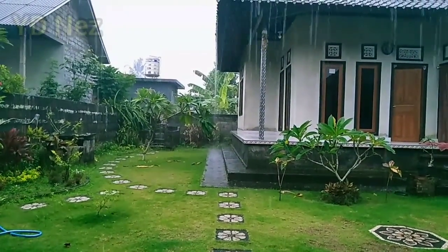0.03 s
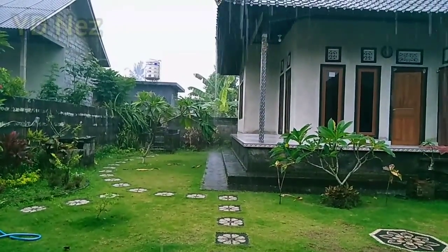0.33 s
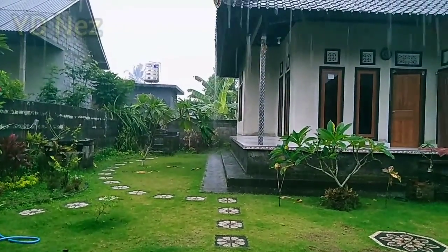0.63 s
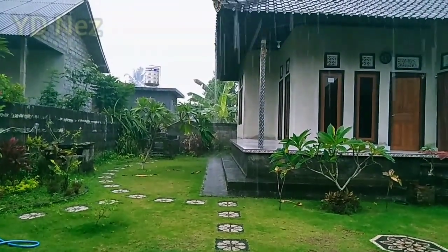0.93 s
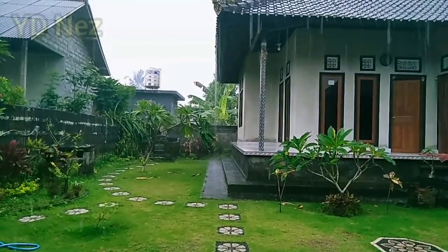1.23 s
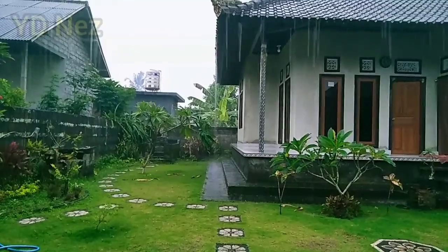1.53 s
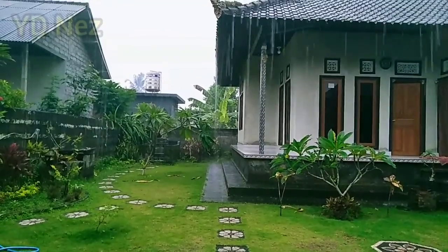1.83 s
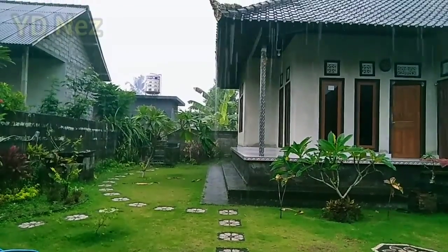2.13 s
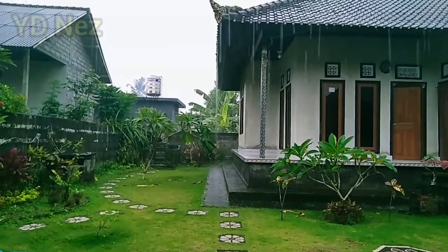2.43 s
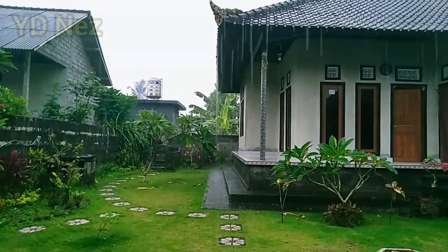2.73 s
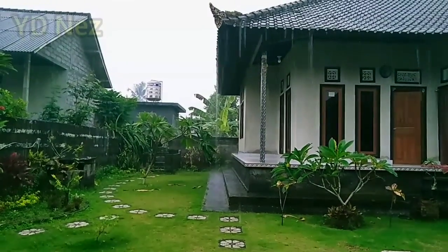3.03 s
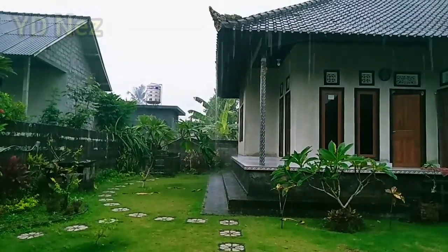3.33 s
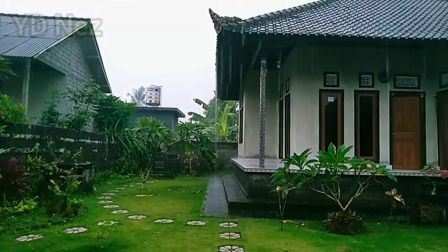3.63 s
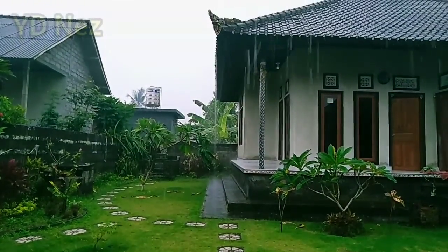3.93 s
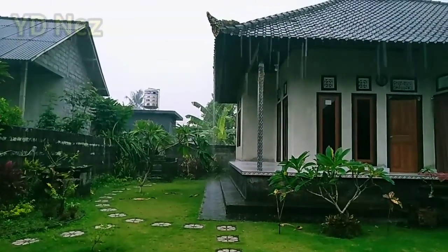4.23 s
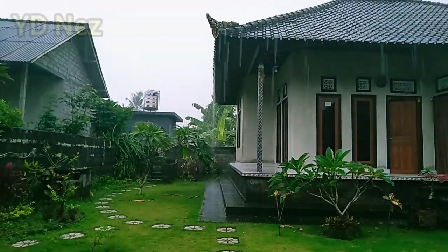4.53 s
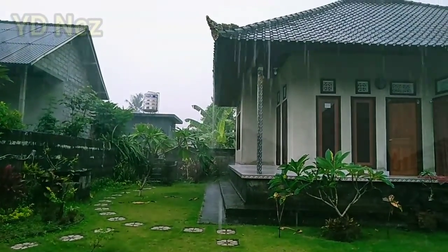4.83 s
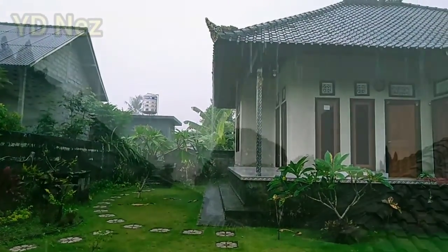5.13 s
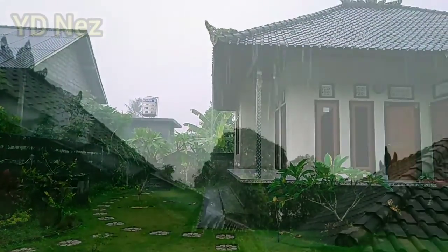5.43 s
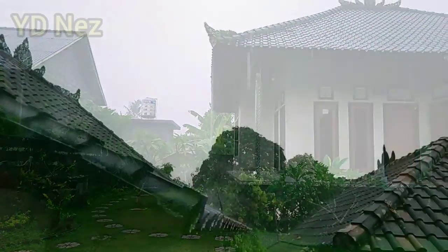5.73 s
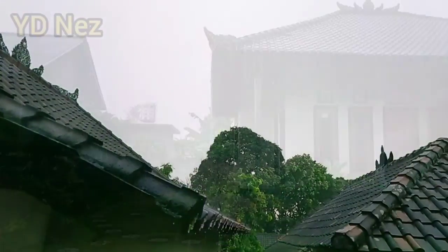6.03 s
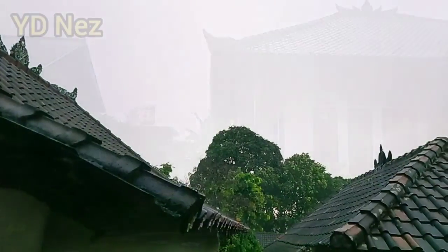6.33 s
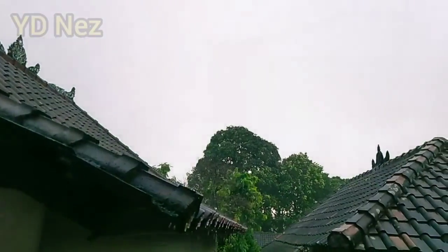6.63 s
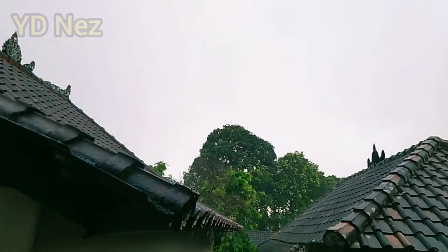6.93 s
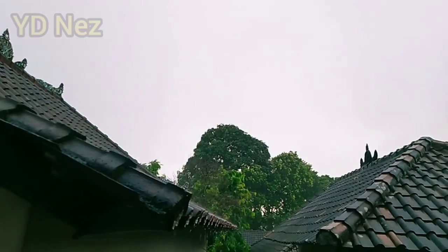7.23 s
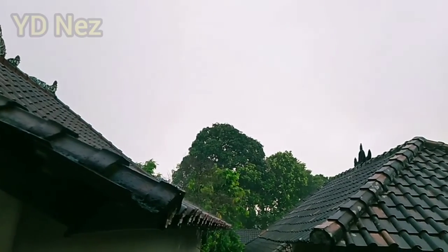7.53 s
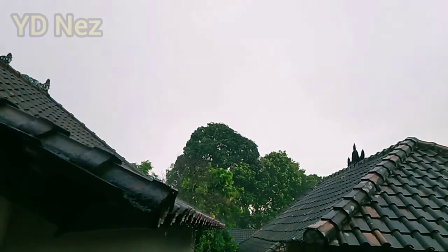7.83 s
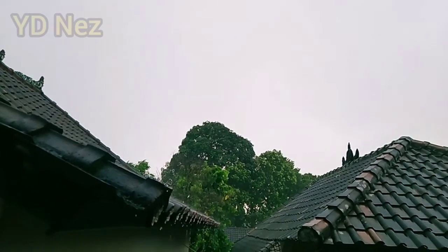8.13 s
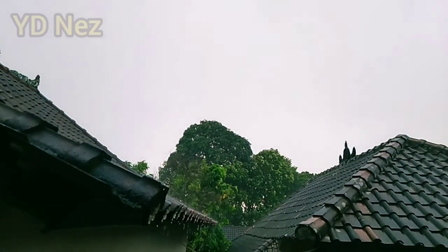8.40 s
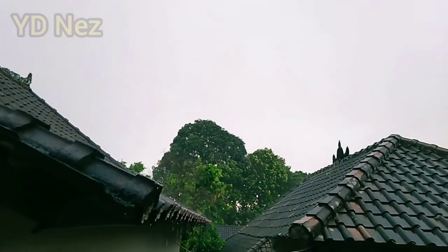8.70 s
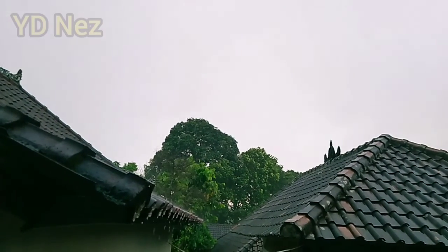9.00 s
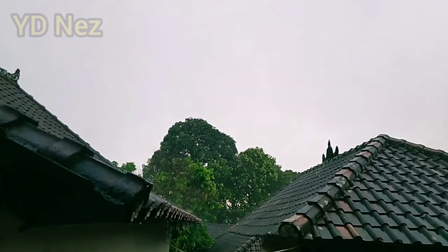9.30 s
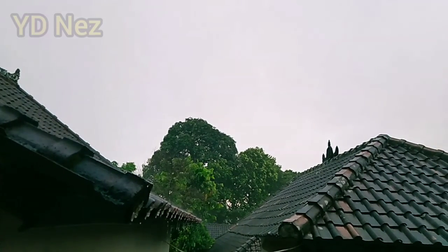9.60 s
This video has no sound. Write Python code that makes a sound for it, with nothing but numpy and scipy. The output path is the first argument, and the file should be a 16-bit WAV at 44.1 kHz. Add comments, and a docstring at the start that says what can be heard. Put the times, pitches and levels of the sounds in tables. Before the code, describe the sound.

Steady rain falls on a village garden, an even hiss with drops tapping on leaves and water from the eaves splashing on paving. Tiny droplets tick right by the microphone. About halfway through, the rain blends into a slightly softer patter on roof tiles, and wind starts to buffet the microphone. The gusts grow into low rumbles and thumps until everything cuts off.

```python
"""A village in steady rain, heard in mono: a garden under dripping eaves fades over to a spot
between tiled roofs. Countless far drops merge into a wash; nearer ones tap on leaves and tiles,
splash on paving or tick right by the microphone. Up by the roofs, gusts buffet the microphone
until the sound stops dead."""
import sys
import numpy as np
from scipy import signal
from scipy.fft import rfft, irfft, next_fast_len
from scipy.io import wavfile
from scipy.ndimage import uniform_filter1d, map_coordinates

SR = 44100
rng = np.random.default_rng(int(sys.argv[2]) if len(sys.argv) > 2 else 0)


def to_wav(s):
    """Save 16-bit WAV."""
    ch = np.atleast_2d(s).T  # columns
    pcm = np.round(np.clip(ch, -1, 1) * 32767)  # PCM
    wavfile.write(sys.argv[1], SR, pcm.astype(np.int16))


N = 434826
T = np.arange(N) / SR
PRE_ROLL = (SR // 1000, 0)  # 1 ms of padding ahead of a hit


def amp(db):
    """Decibels to gain."""
    return 10 ** (np.asarray(db) / 20)


def unit(x):
    """x at rms 1."""
    return x / np.sqrt(np.mean(x ** 2) + 1e-20)


def automation(rows):
    """A fader curve through (seconds, value) points."""
    return np.interp(T, *np.transpose(rows))


def wobble(rate):
    """A smooth random curve with `rate` knots a second."""
    return map_coordinates(rng.standard_normal(int(N * rate / SR) + 4), [T * rate])


def filtered(x, response):
    """x through a gain given as a function of frequency."""
    size = next_fast_len(len(x) + 4096)
    return irfft(rfft(x, size) * response(np.fft.rfftfreq(size, 1 / SR)), size)[:len(x)]


def eq(x, points):
    """x through an EQ curve of (Hz, dB) points on a log axis."""
    freqs, db = np.transpose(points)
    return filtered(x, lambda hz: amp(np.interp(np.log(hz + 1), np.log(freqs), db)))


def unit_presence(x):
    """x scaled so that its presence band, 2 to 5.3 kHz, has rms 1."""
    return x / np.std(filtered(x, lambda hz: (hz > 2000) & (hz < 5300)))


def add(track, start, sound, peak_db):
    """Mix a sound into the track at `start` seconds, peaking at peak_db."""
    part = track[max(round(start * SR), 0):][:len(sound)]
    part += amp(peak_db) * sound[:len(part)] / np.abs(sound).max()


# Steady wind between the gusts. Each row: time in seconds, level in dB.
BREEZE = [(4.3, -52), (4.65, -44.5), (5.05, -45), (5.6, -40), (6.2, -49.5), (6.7, -43.5), (7.45, -46.5),
          (7.9, -40), (9.15, -34)]
# Gusts. Each row: start in seconds, length in seconds, buffeting drive in dB, eddy drive in dB.
GUSTS = [(4.837, 0.028, -39, -37.5), (4.893, 0.093, -41, -41.5), (5.311, 0.047, -35.5, -49),
         (5.465, 0.23, -36.5, -47.5), (5.8, 0.15, -33.5, -44.5), (6.018, .05, -37, -49),
         (6.317, 0.15, -38.5, -54), (6.456, 0.028, -29, -38.5), (6.52, 0.068, -36.5, -52),
         (6.712, 0.061, -27, -39), (6.8, 0.043, -26.5, -38.5), (6.903, .06, -28.5, -46),
         (7.07, 0.058, -26.5, -32), (7.171, 0.046, -24.5, -39), (7.244, .15, -32.5, -42),
         (7.552, 0.055, -34.5, -54), (7.765, 0.037, -34, -56), (7.973, .14, -33, -42),
         (8.118, 0.063, -26.5, -36.5), (8.208, 0.056, -26, -42), (8.285, .05, -28, -33),
         (8.358, 0.081, -26.5, -34), (8.527, 0.15, -24.5, -34), (8.726, 0.039, -44, -36),
         (8.839, 0.067, -26.5, -34), (8.92, 0.019, -24.5, -25), (8.976, .06, -29.5, -25),
         (9.053, 0.082, -35, -32.5)]


def gusts(attack_s=0.01, release_s=0.034, sag_db_per_s=16.5):
    """Buffeting and eddy envelopes in dB: each gust rises, sags and falls away over the breeze."""
    breeze_db = automation(BREEZE)
    buffet_power, eddy_power = amp(breeze_db) ** 2, amp(breeze_db - 8) ** 2
    for start, length, buffet_db, eddy_db in GUSTS:
        age = T - start
        gate = np.clip(age / attack_s, 0, 1) * np.clip(1 - (age - length) / release_s, 0, 1)
        envelope = gate * amp(-sag_db_per_s * np.maximum(age, 0))
        buffet_power += (amp(buffet_db) * envelope) ** 2
        eddy_power += (amp(eddy_db) * envelope) ** 2
    return 10 * np.log10([buffet_power, eddy_power])


# Tone of the low buffeting and of the eddies. Each row: frequency in Hz, gain in dB.
BUFFET_EQ = [(10, 1.5), (30, -1), (70, 0.5), (140, 2), (205, -1), (290, -10.5), (420, -18.5), (900, -45.5)]
EDDY_EQ = [(150, -22.5), (300, 4), (400, 3), (600, 1), (900, -12.5), (1400, -32), (3000, -54)]


def wind():
    """Lumpy low pressure on the microphone; strong gusts shed smaller eddies that reach higher."""
    flutter_db = 3 * np.tanh(wobble(rate=36))
    buffet_db, eddy_db = gusts() + flutter_db
    lumps = np.tanh(wobble(rate=70))
    buffet = amp(buffet_db) * unit(amp(4 * lumps) * eq(rng.standard_normal(N), BUFFET_EQ))
    swirl = amp(4.8 * lumps) * rng.standard_normal(N)
    # in light air the flow stays smooth and sheds almost no eddies
    shedding = 1 / (1 + amp(-48 - eddy_db) ** 2)
    eddies = shedding * amp(eddy_db) * unit(eq(swirl, EDDY_EQ))
    # the highest eddies grow faster than the gust that sheds them
    tearing_eq = [(400, -22.5), (950, 2), (1400, -4.5), (2300, -21), (5000, -53)]
    tearing = amp(1.5 * eddy_db + 3.5) * unit(eq(swirl, tearing_eq))
    fade_in = np.clip((T - 4.25) / 0.07, 0, 1)
    return fade_in * (buffet + eddies + tearing)


# The hardest shoves of air. Each row: start in seconds, peak level in dB.
PUFFS = [(4.846, -27), (5.328, -25.5), (6.479, -16), (6.819, -27), (8.129, -16), (8.295, -12),
         (8.935, -14.5), (8.979, -14.5), (9.106, -23)]


def puffs():
    """Each shove of air gives the diaphragm one low swing with a rough edge."""
    track, t = np.zeros(N), np.arange(SR // 16) / SR
    edge_eq = [(30, -4), (200, -1), (350, 0), (650, -12), (1400, -21), (4000, -56.5)]
    envelope = t * np.exp(-t / 0.0031)
    for start, peak_db in PUFFS:
        hz = 160 * np.exp(0.2 * rng.standard_normal())
        swing = np.sin(2 * np.pi * hz * t)
        edge = unit(eq(rng.standard_normal(len(t)), edge_eq))
        add(track, start, envelope * (swing + 0.23 * edge), peak_db)
    return track


def wash(patchy_db):
    """Far drops merge into noise with drifting patches of colour."""
    spectrum = signal.stft(rng.standard_normal(N), nperseg=512)[2]
    patches = uniform_filter1d(rng.standard_normal(spectrum.shape), size=14, axis=0)  # across pitch
    patches = unit(uniform_filter1d(patches, size=7, axis=1))  # across time
    return unit(signal.istft(spectrum * amp(patchy_db * patches), nperseg=512)[1][:N])


def splats(per_s, spread_db, t60):
    """Drops land at random as bursts of noise: many far and faint, a few near and strong."""
    hits = rng.random(N) < per_s / SR
    size_db = spread_db * np.minimum(rng.standard_normal(N), 2)
    age = np.arange(SR // 40) / SR
    power = signal.fftconvolve(hits * amp(size_db) ** 2, amp(-60 * age / t60) ** 2)[:N]
    return unit(np.sqrt(np.abs(power)) * rng.standard_normal(N))


def patter(count, centre_hz, scatter, decay_cycles, spread_db):
    """Drops on leaves and tiles: each rings for a few cycles at a pitch of its own."""
    starts = rng.integers(0, N, count)
    detune, size = np.clip(rng.standard_normal((2, count, 1)), -2.2, 2.2)
    offsets = np.arange(256)
    cycles = centre_hz * np.exp(scatter * detune) * offsets / SR
    grains = amp(spread_db * size) * np.sin(2 * np.pi * cycles) * np.exp(-cycles / decay_cycles)
    return unit(np.bincount((starts[:, None] + offsets).ravel(), grains.ravel(), N)[:N])


# Fader for the rain bed. Each row: time in seconds, gain in dB.
RAIN_FADER = [(0, -38.5), (.7, -37), (1.3, -38), (2.9, -38), (3.8, -37), (4.5, -39), (5.5, -43.5),
              (6.3, -46), (7.3, -44.5), (9.15, -47.5)]
# Brief dips in the rain bed. Each row: start in seconds, depth in dB, recovery in seconds.
GAIN_DUCKS = [(1.782, 2.5, .12), (3.97, 2, 0.35), (5.37, 1, .3), (7.875, 4, .55), (8.66, 3.5, 1)]


def bed_gain(duck_attack_s=0.0075):
    """The bed wavers slightly; after some sharp close drops the bed's level dips at once and creeps back."""
    level_db = automation(RAIN_FADER) + 0.54 * wobble(rate=22)
    for start, depth_db, recovery in GAIN_DUCKS:
        age = T - start
        level_db -= depth_db * np.clip(age / duck_attack_s, 0, 1) * np.clip(1 - age / recovery, 0, 1)
    return amp(level_db)


# Tone of the rain's body and fine spray in each place. Each row: frequency in Hz, gain in dB.
GARDEN_EQ = [(25, -11), (50, -11.5), (80, -15), (150, -8.5), (230, -4), (310, -10.5), (380, -1.5),
             (470, -3), (800, -2.5), (1620, -1.5), (2900, -5.5), (3700, -5.5), (5300, -10), (7000, -15)]
ROOF_EQ = [(60, 12), (300, -18), (480, -1.5), (800, -2.5), (1300, -0.5), (2050, 0.5), (2700, -6.5),
           (3800, -7.5), (5300, -13.5), (6500, -22)]
GARDEN_SPRAY_EQ = [(3500, -44.5), (5300, -13), (6700, -3), (7800, 1.5), (8150, 1), (9050, -7.5),
                   (10700, -15.5), (12500, -9.5), (14300, -1.5), (15700, 2.5)]
ROOF_SPRAY_EQ = [(3500, -37), (5600, -15.5), (6700, -8.5), (7800, 1.5), (8200, -1), (9100, -6.5),
                 (10800, -8.5), (12500, -9), (14300, -3.5), (15700, 2)]


def rain_bed(fade_start_s=4.3, fade_s=3.74):
    """Patter below, spray above; the garden crossfades to the roofs, where droplets stand out more."""
    # the same splats feed the body and the spray
    leaf_splats = splats(per_s=510, spread_db=7.5, t60=0.0065)
    tile_splats = splats(per_s=220, spread_db=7, t60=0.006)
    leaf_rings = patter(count=4000, centre_hz=2835, scatter=0.38, decay_cycles=1.25, spread_db=3)
    tile_rings = patter(count=1800, centre_hz=3230, scatter=0.35, decay_cycles=1.8, spread_db=4.5)
    bright_eq = [(600, -9.5), (3000, 3)]
    leaves = amp(-17.5) * leaf_rings + amp(-7) * eq(leaf_splats, bright_eq)
    tiles = amp(-18) * tile_rings + amp(-9) * eq(tile_splats, bright_eq)
    garden_body = unit_presence(eq(wash(patchy_db=1.14) + leaves, GARDEN_EQ))
    roof_body = unit_presence(eq(wash(patchy_db=1) + tiles, ROOF_EQ))

    garden_spray = unit(eq(wash(patchy_db=1.14) + amp(-10) * leaf_splats, GARDEN_SPRAY_EQ))
    droplets = eq(splats(per_s=290, spread_db=6.5, t60=0.002), [(6000, -10), (12000, -2)])
    roof_drops = amp(-6.5) * tile_splats + amp(-10) * droplets
    roof_spray = unit(eq(wash(patchy_db=2.3) + roof_drops, ROOF_SPRAY_EQ))

    crossfade = np.clip((T - fade_start_s) / fade_s, 0, 1)
    garden_gain, roof_gain = np.sqrt(1 - crossfade), np.sqrt(crossfade)
    body = garden_gain * garden_body + roof_gain * roof_body
    spray = garden_gain * amp(11) * garden_spray + roof_gain * amp(12) * roof_spray
    # the spray flutters a little more than the body
    return bed_gain() * (body + amp(0.55 * wobble(rate=14)) * spray)


# Fat drops on leaves and tiles. Each row: start in seconds, peak level in dB, pitch in Hz.
TAPS = [(0.4384, -14.5, 2680), (0.5857, -20, 2590), (0.805, -13.5, 4700), (1.9195, -15.5, 4400),
        (1.9555, -21, 2630), (2.149, -18.5, 2300), (2.782, -20, 3980), (3.029, -20.5, 3270),
        (3.4765, -23, 4230), (4.119, -14, 3100), (5.4048, -24.5, 2500), (5.5088, -22.5, 4000),
        (5.6498, -24, 4610), (5.914, -23, 3760), (7.2509, -29, 4060), (7.7243, -24, 2990),
        (8.35, -23, 2410), (8.6424, -29.5, 3950)]


def taps():
    """A fat drop lands with a noisy slap and a very short ring."""
    track, t = np.zeros(N), np.arange(SR // 12) / SR
    slap_eq = [(700, -30), (1900, 1), (3800, 9), (8000, -8.5), (15000, -33)]
    envelope = amp(-60 * t / 0.014) + amp(-12 - 60 * t / 0.09)
    for start, peak_db, hz in TAPS:
        ring = np.sin(2 * np.pi * hz * t) * amp(-60 * t / 0.0067)
        slap = eq(np.pad(envelope * rng.standard_normal(len(t)), PRE_ROLL), slap_eq)
        add(track, start, np.pad(ring, PRE_ROLL) + 0.65 * slap, peak_db)
    return track


# Drips from the eaves. Each row: start in seconds, peak level in dB.
SPLASHES = [(0.8047, -18), (0.8214, -14.5), (0.873, -15), (1.052, -21.5), (1.929, -13.5), (1.9444, -18),
            (2.7831, -22.5), (2.8799, -21), (3.007, -22), (3.8284, -17.5), (3.9014, -22), (4.4209, -21),
            (4.453, -17.5), (4.6528, -22), (4.9315, -20), (5.823, -19.5), (7.2814, -28), (8.187, -27)]
# Splash tone, with the microphone's treble peaks. Each row: frequency in Hz, gain in dB.
SPLASH_EQ = [(500, -47), (2000, -17), (5300, -0.5), (6800, 6), (7800, 12.5), (9000, -2.5), (11000, -12.5),
             (13000, -2), (15600, -26)]


def splashes():
    """Water from the eaves hits the paving: a bright burst, then a tail of scattered droplets."""
    track, t = np.zeros(N), np.arange(SR // 12) / SR
    burst = (1 - np.exp(-t / 0.001)) * amp(-60 * t / 0.0059)
    tail = amp(-19 - 60 * t / 0.15)
    for start, peak_db in SPLASHES:
        add(track, start, eq((burst + tail) * rng.standard_normal(len(t)), SPLASH_EQ), peak_db)
    return track


# Droplets right by the microphone. Each row: start in seconds, peak level in dB.
TICKS = [(1.2416, -14.5), (1.7764, -10), (2.607, -13), (4.7117, -16), (5.3612, -10), (6.6653, -16),
         (7.0, -18), (7.414, -14), (7.4204, -12), (7.5574, -13), (7.7553, -12.5), (7.869, -18),
         (8.6527, -12)]
# Tick tone, with the microphone's treble peaks. Each row: frequency in Hz, gain in dB.
TICK_EQ = [(1000, -20), (5000, -14), (8000, 1), (11000, 0), (13500, 6), (15600, 2)]


def ticks():
    """A tiny drop lands with a dry snap and rings briefly at the very top of the range."""
    track, t = np.zeros(N), np.arange(SR // 12) / SR
    envelope = amp(-60 * t / 0.0035) + amp(-14 - 60 * t / 0.03)
    for start, peak_db in TICKS:
        ping = np.sin(2 * np.pi * rng.uniform(13800, 15600) * t) * amp(-60 * t / 0.002)
        snap = eq(np.pad(envelope * rng.standard_normal(len(t)), PRE_ROLL), TICK_EQ)
        add(track, start, np.pad(ping, PRE_ROLL) + 0.55 * snap, peak_db)
    return track


def scene():
    """Rain bed, close drops and wind, alike in both channels."""
    mono = rain_bed() + taps() + splashes() + ticks() + wind() + puffs()
    return np.array([mono, mono])


def record(dry, stop_s=9.15, top_hz=15830):
    """A hard cut to silence, then a steep low-pass."""
    low_pass = signal.firwin(601, top_hz, fs=SR, window=("kaiser", 9))
    return signal.fftconvolve(dry * (T < stop_s), low_pass[None], mode="same", axes=1)


dry = scene()
out = record(dry)
to_wav(out)
```